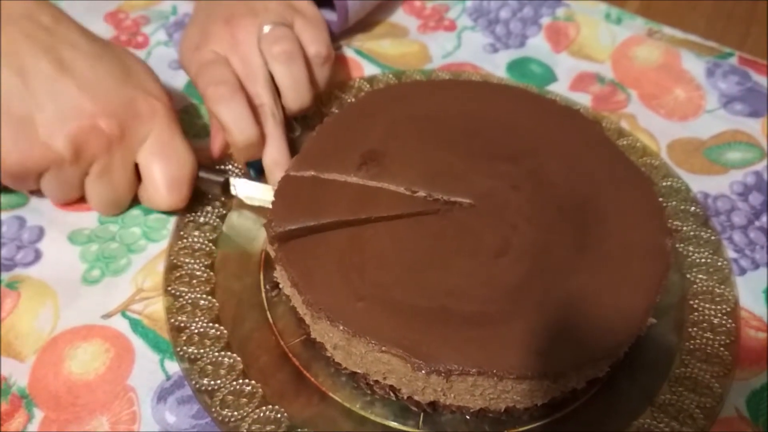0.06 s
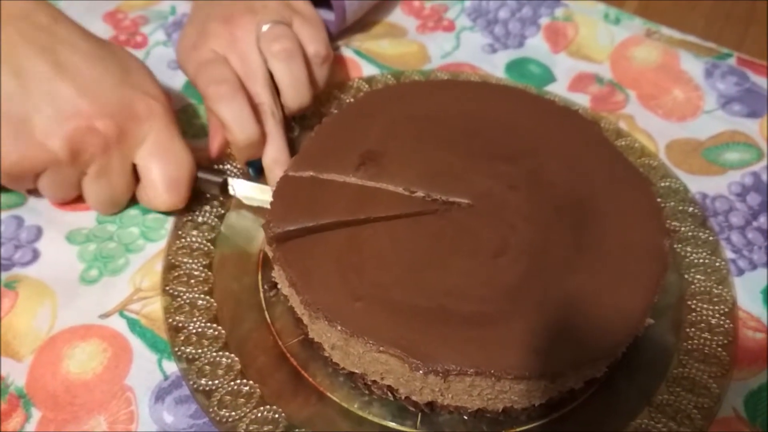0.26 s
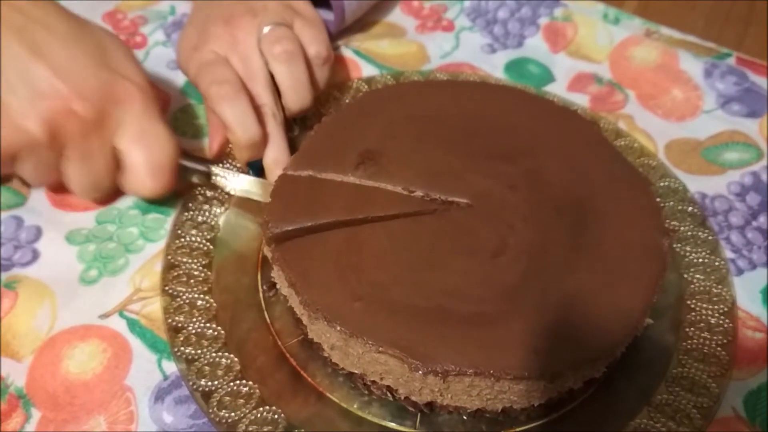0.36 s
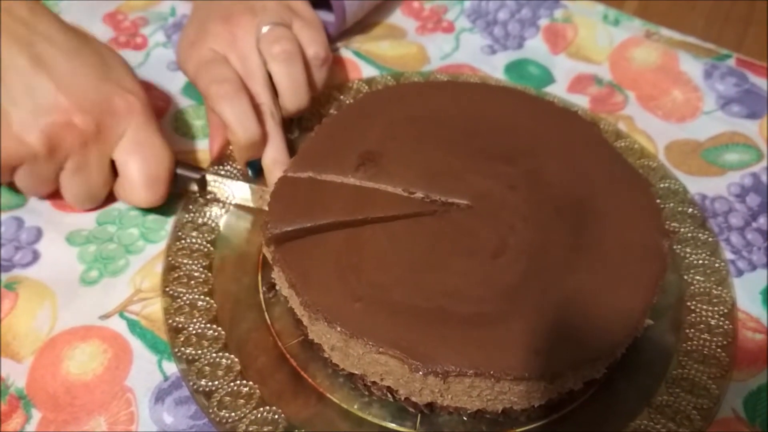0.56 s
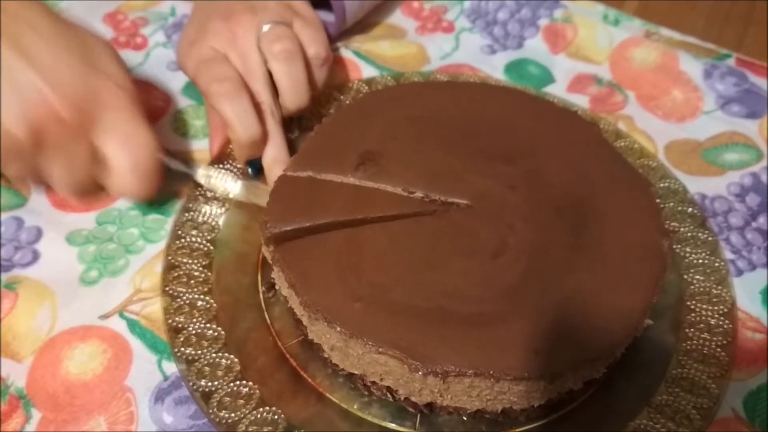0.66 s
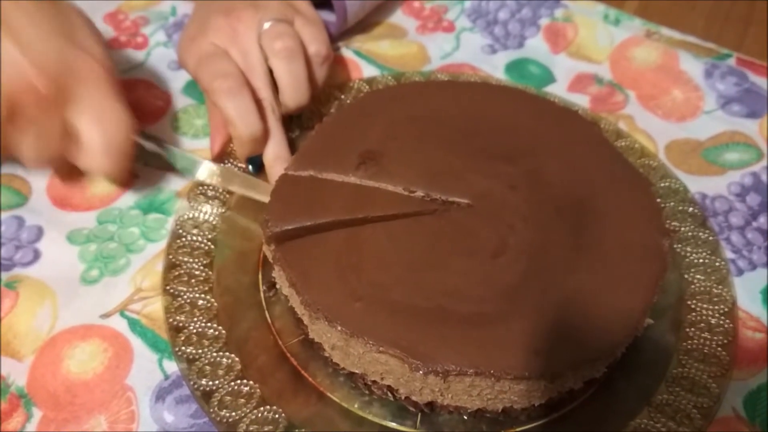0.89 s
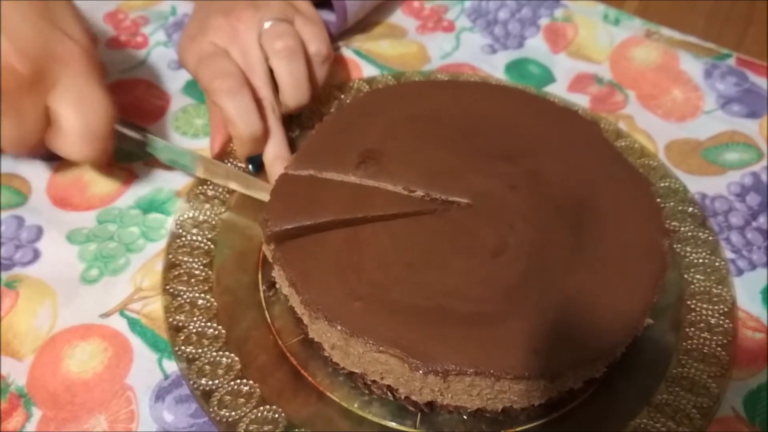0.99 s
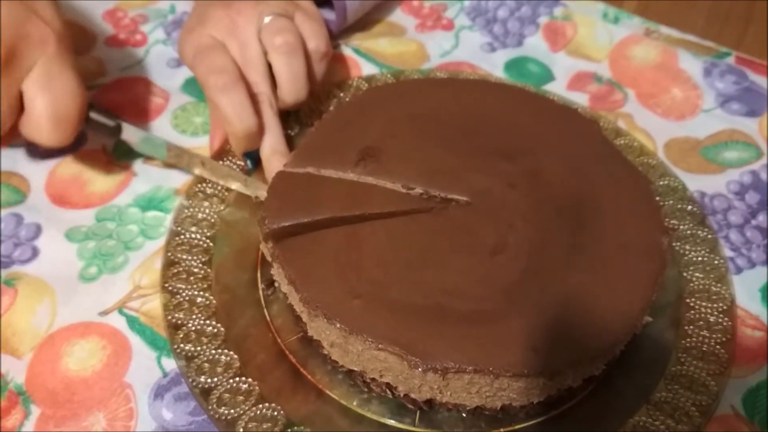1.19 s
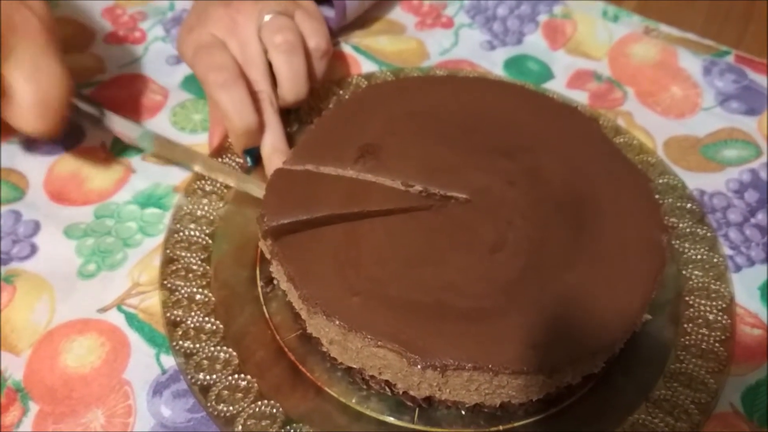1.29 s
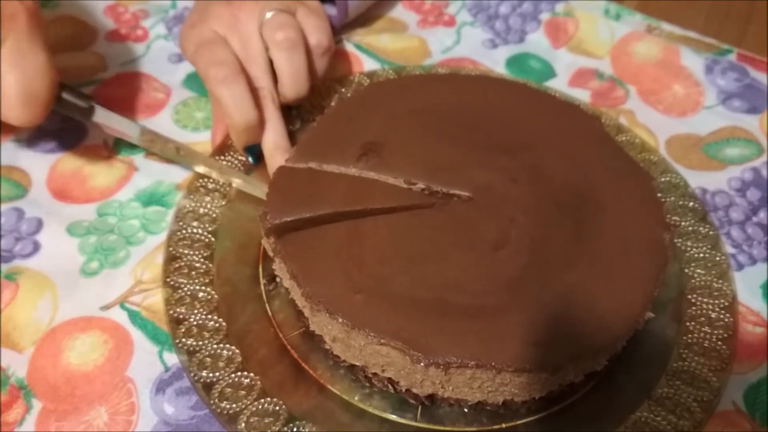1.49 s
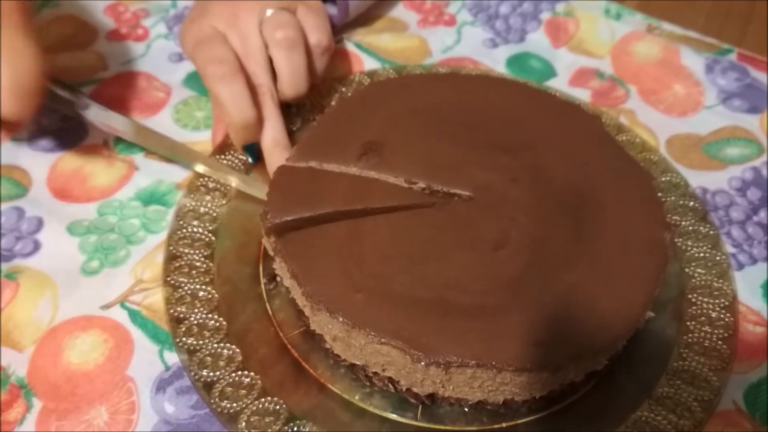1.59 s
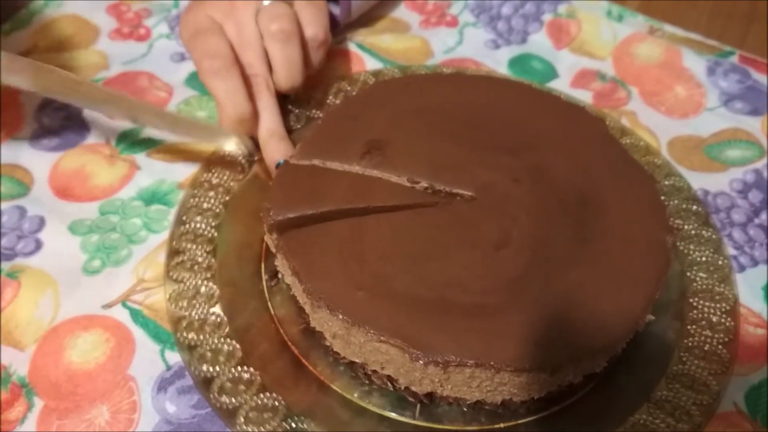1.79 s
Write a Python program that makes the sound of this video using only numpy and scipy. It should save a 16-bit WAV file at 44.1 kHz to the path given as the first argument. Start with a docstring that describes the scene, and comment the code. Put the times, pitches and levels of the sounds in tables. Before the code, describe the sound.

A knife saws through a crisp cake base, crunching in short bright bursts, close up indoors.

```python
"""Sawing through a crisp cake base

A knife is sawn out through the hard base of a cake on a card board on a kitchen table, heard close up.
The crust snaps in short bursts of bright noise and crumbles between them as showers of tiny decaying grains.
Board, table and blade are sets of resonances, driven by the breaking crust, blows and rubbing.
A small room answers with a fading noise tail, over a low household rumble of filtered noise."""
import sys
import numpy as np
from scipy import signal
from scipy.fft import rfft, irfft, next_fast_len
from scipy.io import wavfile
from scipy.ndimage import uniform_filter1d, map_coordinates

SR = 44100
rng = np.random.default_rng(int(sys.argv[2]) if len(sys.argv) > 2 else 0)


def to_linear_factor(level_db):
    """Convert decibel levels (scalar or array-like) to linear amplitude factors."""
    exponent = np.asarray(level_db, float) / 20
    return 10 ** exponent


def materialize(psi):
    """Save the field psi as 16-bit PCM at rate SR to the path in sys.argv[1].

    A 1-D psi becomes a single channel; in a 2-D psi each row is a channel.
    """
    bounded = np.clip(np.atleast_2d(psi).T, -1, 1)
    quanta = np.round(bounded * 32767).astype(np.int16)
    wavfile.write(sys.argv[1], SR, quanta)


N = 81585  # length in samples

LAG_MS, BOARD_LAG_MS = 0.19, 0.12  # left behind right: crust and blade, board
BOARD_SPREAD, BOARD_PATCHY_DB = 0.35, 4.5  # noise on the board: unlike over alike sound, colour shifts


def unit(x):
    """Scale to rms 1."""
    return x / np.sqrt(np.mean(x ** 2) + 1e-20)


def along(points, hz):
    """Read a curve of (Hz, value) points on a log frequency axis."""
    f, v = np.transpose(points)
    return np.interp(np.log(hz + 1), np.log(f + 1), v)


def over_time(seconds, values):
    """Join values at given times into a curve with one value per sample."""
    return np.interp(np.arange(N) / SR, seconds, values)


def wobble(rate):
    """A smooth random curve through `rate` random points a second."""
    knots = rng.standard_normal(int(N * rate / SR) + 4)
    return map_coordinates(knots, [np.arange(N) * rate / SR])


def filtered(x, response):
    """Multiply the spectrum of x by a complex response of frequency."""
    m = next_fast_len(N + SR // 2)
    hz = np.fft.rfftfreq(m, 1 / SR)
    return irfft(rfft(x, m) * response(hz), m)[..., :N]


def lagged(x, ms):
    """Sound from one side: the left channel hears it ms later than the right."""
    side = np.array([[1], [-1]])
    return filtered(x, lambda hz: np.exp(-1j * np.pi * side * hz * ms / 1000))


def pair(spread, patchy_db=0):
    """Stereo noise, partly alike on both sides, whose colour shifts from moment to moment."""
    z = signal.stft(rng.standard_normal((2, N)), nperseg=128)[2]
    field = rng.standard_normal(z.shape[1:])
    field = uniform_filter1d(field, size=7, axis=0)  # smooth over frequency
    field = uniform_filter1d(field, size=6, axis=1)  # smooth over time
    a, b = signal.istft(z * to_linear_factor(patchy_db * unit(field)), nperseg=128)[1][:, :N]
    return unit(np.array([a + spread * b, a - spread * b]))


def body(force, modes):
    """A solid thing rings at its resonances; white noise keeps its power on the way through."""
    def ring(hz):
        total = 0
        for k, (centre, width, db) in enumerate(modes):
            damping = 1j * hz * width
            # neighbouring modes have opposite signs
            total = total + (-1) ** k * to_linear_factor(db) * damping / (centre ** 2 - hz ** 2 + damping)
        return total
    return filtered(force, lambda hz: ring(hz) / np.sqrt(np.mean(abs(ring(hz)) ** 2)))


def pushes(rows, ms):
    """One soft push for each (seconds, dB) row, at its peak after ms."""
    blows, t = np.zeros(N + SR), np.arange(SR // 20) / SR * 1000 / ms
    for s, db in rows:
        blows[round(s * SR):][:len(t)] += to_linear_factor(db) * t * np.exp(1 - t)
    return blows[:N]


def bursts(rows, rise_ms):
    """Envelope of (seconds, dB, fall in ms) bursts: quick rise, exponential fall."""
    env, t = np.zeros(N + SR), np.arange(SR // 8) / SR * 1000
    for s, db, ms in rows:
        shape = (1 - np.exp(-t / rise_ms)) * np.exp(-t / max(ms, 0.2))
        env[round(s * SR):][:len(t)] += to_linear_factor(db) * shape
    return env[:N]


# Colour of the household rumble. Each row: frequency in Hz, relative level in dB per Hz.
RUMBLE_COLOUR = [(12, -36), (30, -8), (65, 7.5), (270, -5), (400, -20), (560, -27.5), (1200, -39.5),
                 (3000, -46.5), (9000, -45), (16000, -45)]


def rumble():
    """Low household rumble: noise with a falling spectrum, mostly alike on both sides."""
    a, b = filtered(rng.standard_normal((2, N)), lambda hz: to_linear_factor(along(RUMBLE_COLOUR, hz)))
    return to_linear_factor(-70.5) * unit(np.array([a + 0.13 * b, a - 0.4 * b]))


# How long the kitchen echoes. Each row: frequency in Hz, time to fade by 60 dB in seconds.
ROOM_FADE = [(150, 0.24), (1000, 0.22), (4000, .22), (12000, 0.18)]


def room(x):
    """The kitchen answers with a noise tail in which each frequency dies at its own speed."""
    alike_hz = 350  # well below this, both sides hear the same tail
    hz, t, z = signal.stft(rng.standard_normal((2, SR // 2)), SR, nperseg=256)
    unlike = (hz / (hz + alike_hz))[:, None]
    z = np.array([z[0] + unlike * z[1], z[0] - unlike * z[1]]) / np.sqrt(1 + unlike ** 2)
    fade = to_linear_factor(-60 * t / along(ROOM_FADE, hz)[:, None])
    tail = signal.istft(z * fade, SR, nperseg=256)[1]
    tail = tail / np.linalg.norm(tail[0])
    late = np.pad(x, (130, 0))[None]  # the answer starts 130 samples late
    return signal.fftconvolve(late, tail, axes=1)[:, :N]


# Resonances of the table top. Each row: frequency in Hz, width in Hz, relative level in dB.
TABLE_MODES = [(63, 18, -3.5), (115.5, 48.6, -5), (168, 40.5, 0.5), (227, 44.5, -1.5), (302.4, 76, -2.5),
               (328.8, 40, -2)]


def table_top(force):
    """The table top booms at its low resonances under a force."""
    return body(force, TABLE_MODES)


# Resonances of the board and plate. Each row: frequency in Hz, width in Hz, relative level in dB.
BOARD_MODES = [(447.6, 64, -11.5), (597, 56, -2), (696.4, 110, -3), (912, 204, 0), (1127, 170, -2),
               (1303, 180, -5), (1600, 220, -6.5), (2120, 490, -7.5), (2633, 330, -3.5), (3405, 710, -7)]


def board(force):
    """The board rings under a force, slightly later on the left."""
    return lagged(body(force, BOARD_MODES), BOARD_LAG_MS)


# Colour of breaking crust. Each row: frequency in Hz, relative level in dB per Hz.
CRUST_COLOUR = [(880, -42.5), (1500, -11.5), (1830, -12.5), (2850, -11), (4340, -11), (6110, -3.5),
                (7390, -9), (10800, 2), (13400, 2), (15500, -5), (16500, -44.5)]


def crust(env):
    """Breaking crust: bright noise shaped by an envelope, then coloured."""
    colour = [(500, -49.5)] + list(CRUST_COLOUR)
    noise = env * pair(spread=0.6, patchy_db=4)
    return lagged(filtered(noise, lambda hz: unit(to_linear_factor(along(colour, hz)))), LAG_MS)


# The blade jolts the table. Each row: start in seconds, peak push in dB before the table's trim.
TABLE_JOLTS = [(.079,-52), (.118,-43.5), (.209,-56), (.319,-39), (.437,-39.5), (.512,-29.5), (.695,-45.5),
               (.779,-53), (.859,-51.5), (.955,-41.5), (.999,-46), (1.035,-47), (1.13,-49.5), (1.173,-46.5),
               (1.241,-42)]
# The blade strikes the board. Each row: start in seconds, peak push in dB before the board's trim.
BOARD_KNOCKS = [(.2175,-25), (.3985,-30), (.42,-31.5), (.427,-46), (.455,-32), (.5178,-13), (.701,-34),
                (.844,-39.5), (.869,-38.5), (.959,-35), (.998,-33), (1.002,-32.5), (1.196,-40.5), (1.7,-58)]


def jolts():
    """Blows of the blade: brief pushes that set board and table ringing."""
    knock_ms, knock_db = 0.22, -7.5  # time to the peak, trim
    jolt_ms, jolt_db = 0.35, -12.5
    on_board = to_linear_factor(knock_db) * board(pushes(BOARD_KNOCKS, knock_ms))
    on_table = to_linear_factor(jolt_db) * table_top(pushes(TABLE_JOLTS, jolt_ms))
    return on_board + on_table


# Resonances of the steel blade. Each row: frequency in Hz, width in Hz, relative level in dB.
BLADE_MODES = [(2770, 140, -10.5), (5200, 200, -14.5), (7600, 200, -5.5), (9700, 300, -8.5),
               (10300, 260, -2.5), (11700, 200, 8), (12500, 900, -3), (13700, 100, -1), (15600, 190, -6)]
# The blade slides free of the crust. Each row: time in seconds, rubbing force in dB before its wobble.
SLIDE_FORCE = [(1.40, -100), (1.45, -71.5), (1.55, -82), (1.578, -83.5), (1.583, -72), (1.586, -80.5),
               (1.590, -67.5), (1.60, -85), (1.639, -82), (1.66, -72.5), (1.72, -78), (1.80, -94.5),
               (1.85, -100)]


def slide():
    """Light rubbing keeps the blade's resonances singing as it is drawn out."""
    level = over_time(*np.transpose(SLIDE_FORCE))
    force = to_linear_factor(level + 2.7 * wobble(42)) * pair(1.0, patchy_db=3)
    return lagged(body(force, BLADE_MODES), LAG_MS)


# The strokes of the saw, before a small random wobble.
# Each row: time in seconds, crumbling in dB, board over crumbling in dB,
# push on the table over crumbling in dB.
SAW_STROKES = [(0,-65,-21,4.5), (0.059,-75,-4.5,-5), (0.077,-53.5,-6.5,-7.5), (.138,-61.5,4,4),
               (0.191,-60.5,0,-2.5), (0.219,-56.5,15.5,11.5), (0.255,-55,-8,-37), (0.296,-69,6,2),
               (0.334,-62,-4,-12), (.36,-54,1,-1.5), (.43,-55,5.5,-4), (0.469,-67,-6,8), (.49,-57,7,-3),
               (.515,-44,8,5.5), (.54,-55.5,12.5,12), (.592,-71.5,6,8), (.654,-68,-2,-3),
               (0.679,-58.5,3.5,-2), (0.708,-61.5,8,10), (.746,-60.5,1.5,-0.5), (.798,-64,3.5,5.5),
               (.86,-67,0,7.5), (0.921,-67.5,-3.5,9.5), (0.964,-62,3,12.5), (.984,-61.5,2.5,6),
               (1.008,-57.5,8.5,3.5), (1.104,-65.5,-6.5,-4), (1.192,-62.5,0.5,9), (1.226,-68,-8,-16),
               (1.252,-64.5,1,5), (1.298,-68.5,-5.5,-3), (1.33,-65,1,-1.5), (1.396,-69.5,-11,0.5),
               (1.429,-70.5,6.5,2), (1.5,-79,-5,7), (1.57,-86,-19.5,13), (1.678,-90.5,-3.5,20.5),
               (1.72,-92.5,14.5,23.5), (1.85,-100,-16.5,14)]


def sawing():
    """Crumbs break at random under the blade and shake the board; the push rocks the table."""
    crumbs_per_s, crumb_ms = 450, 0.52  # ms: fall of one crumb
    spread_db = 1.5  # crumbs are on average this far above the smallest
    rub_db = 1  # smooth rubbing over the crumbs
    seconds, *columns = np.transpose(SAW_STROKES)
    level, deep, push = [over_time(seconds, c) for c in columns]
    chance, luck = rng.random((2, N))
    sizes = (1 - luck) ** (-spread_db / 20 * np.log(10))  # many small, few large
    breaks = (chance < crumbs_per_s / SR) * sizes
    decay = np.exp(-np.arange(SR // 50) / SR * 1000 / crumb_ms)
    crumbs = signal.fftconvolve(breaks, decay)[:N]
    grit = unit(unit(crumbs) + to_linear_factor(rub_db)) * to_linear_factor(level + 0.73 * wobble(30))
    shaking = grit * to_linear_factor(deep) * pair(BOARD_SPREAD, BOARD_PATCHY_DB)
    rocking = to_linear_factor(level + push + 0.73 * wobble(29)) * pair(0.17)
    return crust(grit) + board(shaking) + table_top(rocking)


# The crust snaps. Each row: start in seconds, level in dB, board over crust in dB, fall in ms.
# Levels are before the trims in snaps().
CRUST_SNAPS = [(0.0713,-55,-1.5,4.5), (0.1068,-33.5,-42,6.1), (0.1246,-37,-10,5.2), (0.1948,-36,-17,12),
               (0.2068,-32.5,-3.5,5.8), (0.213,-35,-0.5,3.2), (0.2173,-21.5,-5.5,3.3), (.2274,-50,-23,3.2),
               (0.3468,-34,-6.5,2.75), (0.353,-39.5,-19,4.5), (.3586,-42,-20,2.1), (.3652,-35,-24,3.7),
               (0.3868,-36,1,3.4), (.399,-28,-16,3), (.4206,-38,-2,7.1), (.4424,-41.5,-7,4.2),
               (0.4537,-30.5,0.5,3), (0.4643,-31,1,4.5), (0.499,-31,-6.5,3.6), (0.507,-34.5,1.5,9.1),
               (0.51,-37,-7,6.5), (0.5185,-17,-13,2.6), (.524,-31.5,-10.5,7.1), (0.529,-30,1.5,5),
               (.5374,-38,3.5,4), (0.651,-45,-37,3.9), (.6710,-27,-9,2.54), (0.6752,-36,-19,3),
               (0.695,-35,-22,2.2), (0.702,-29.5,-4.5,4), (0.7262,-36,-14,4.3), (0.813,-42.5,-2.5,2.9),
               (0.8433,-49,7,4), (0.869,-39.5,-8.5,4.8), (0.9603,-40,-10.5,5.2), (0.9747,-44.5,-5,11.5),
               (1.0008,-30.5,-9,5), (1.009,-38,-10.5,4.3), (1.0151,-34,-11,3.4), (1.0316,-34,-22,5.3),
               (1.1174,-46,-9,1.9), (1.1469,-32,-17.5,4.1), (1.1732,-39,-17,1.8), (1.1755,-31.5,-9,3),
               (1.1986,-49,1.5,7.2), (1.2065,-36,-21,2.5), (1.2571,-30,-27,2.4), (1.2864,-53,-13.5,1.9),
               (1.3111,-40,-18.5,9.3), (1.3673,-42,-27,2.7), (1.413,-41.5,-21.5,3.4), (1.422,-38,-22.5,4),
               (1.432,-43.5,-11,8.2), (1.695,-71,10,3.5), (1.7008,-70,9,13.8)]


def snaps():
    """Each snap is a ragged run of splinters that also drives the board."""
    crust_db, board_db = -5.5, -2  # trims
    ragged = unit(to_linear_factor(2.5 * wobble(1300)))  # swing in dB, splinters a second
    bright = bursts([(s, db + crust_db, ms) for s, db, _, ms in CRUST_SNAPS], rise_ms=0.53)
    deep = bursts([(s, db + rel + board_db, ms) for s, db, rel, ms in CRUST_SNAPS], rise_ms=1.2)
    shaking = deep * ragged * pair(BOARD_SPREAD, BOARD_PATCHY_DB)
    return crust(bright * ragged) + board(shaking)


# Balance of the two sides. Each row: frequency in Hz, left over right in dB.
SIDE_BALANCE = [(60, -0.5), (200, 2), (500, -1.5), (1290, 0), (2380, 5.5), (4400, -1), (8120, -3.5),
                (13000, -4)]


def balanced(x):
    """Each frequency is shared unequally between left and right."""
    side = np.array([[1], [-1]])
    return filtered(x, lambda hz: to_linear_factor(side * along(SIDE_BALANCE, hz) / 2))


def scene():
    """The cut, the room's answer to its right channel, and the rumble."""
    cut = snaps() + sawing() + jolts() + slide()
    return balanced(cut) + to_linear_factor(-9) * room(cut[1]) + rumble()


def roll_off(x):
    """The treble ends steeply here."""
    return signal.sosfilt(signal.butter(12, 16960, fs=SR, output="sos"), x)


def record(dry):
    """The microphone loses the lowest bass and everything from the top limit up."""
    low_cut_hz, top_hz = 33, 16500

    def microphone(hz):
        return (hz < top_hz) * (1j * hz / (low_cut_hz + 1j * hz)) ** 2
    mix = filtered(dry, microphone)
    return roll_off(mix)


dry = scene()
out = record(dry)
materialize(out)
```